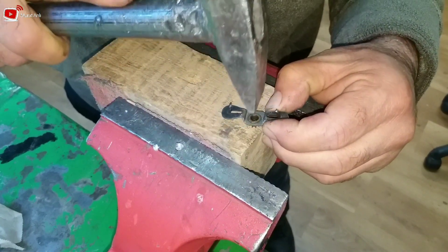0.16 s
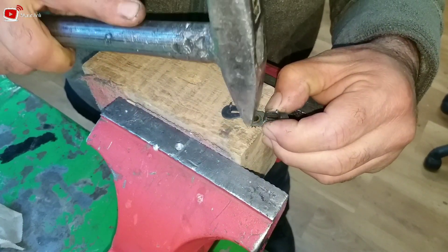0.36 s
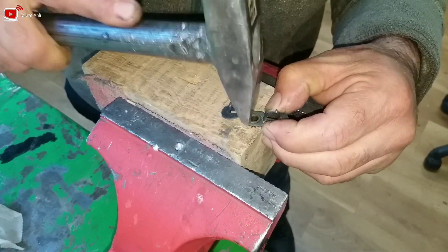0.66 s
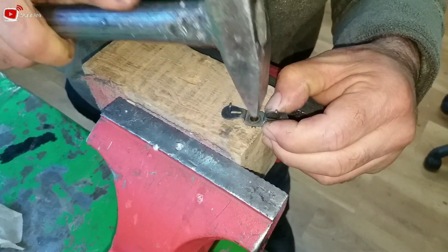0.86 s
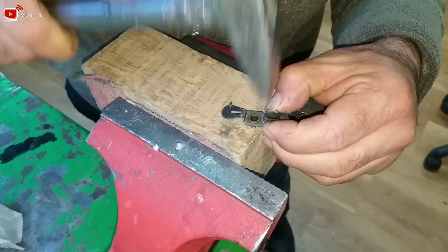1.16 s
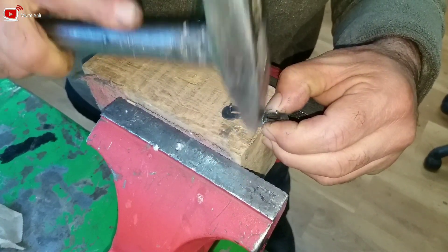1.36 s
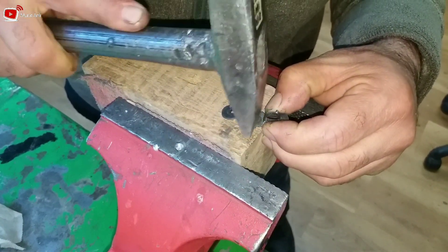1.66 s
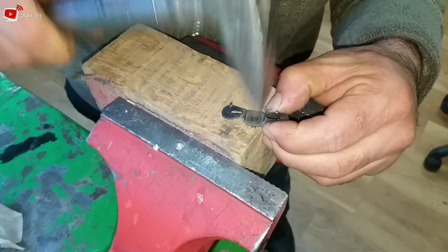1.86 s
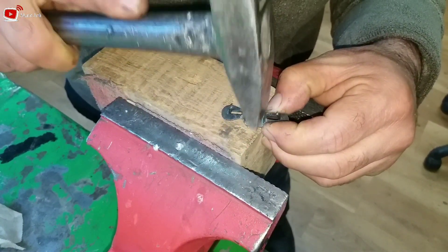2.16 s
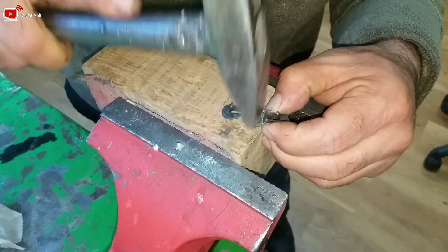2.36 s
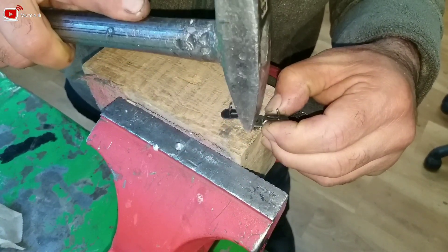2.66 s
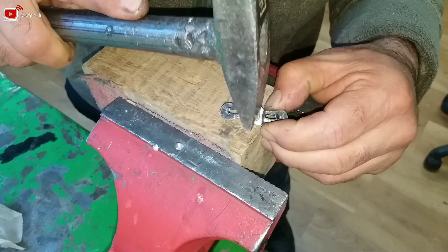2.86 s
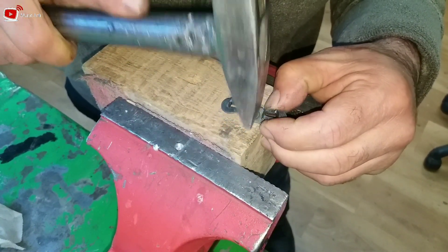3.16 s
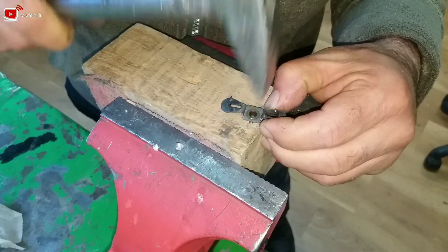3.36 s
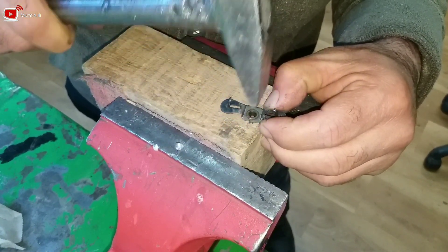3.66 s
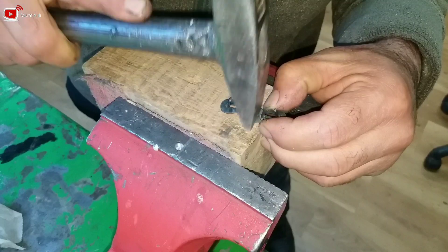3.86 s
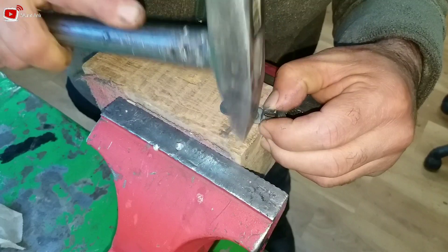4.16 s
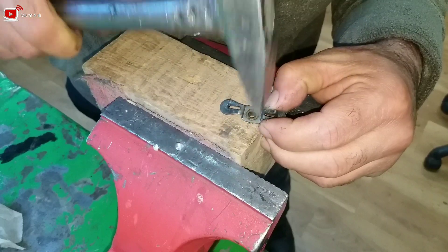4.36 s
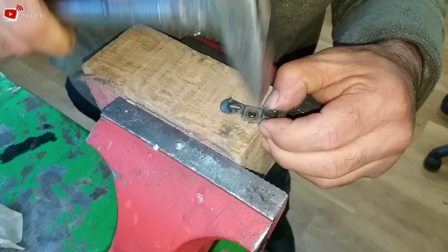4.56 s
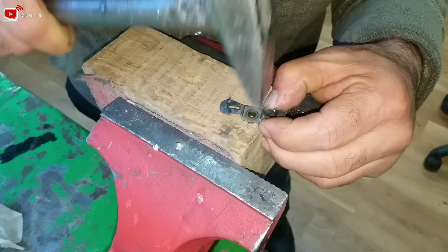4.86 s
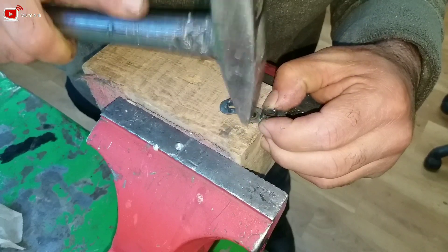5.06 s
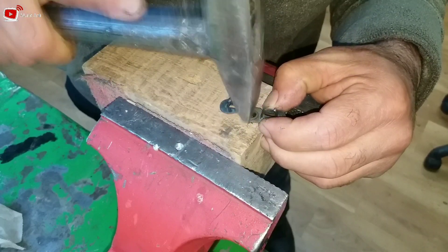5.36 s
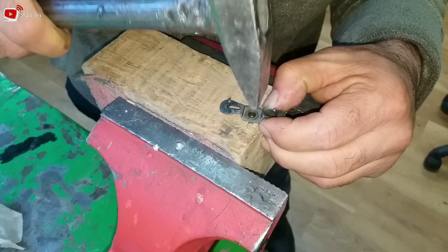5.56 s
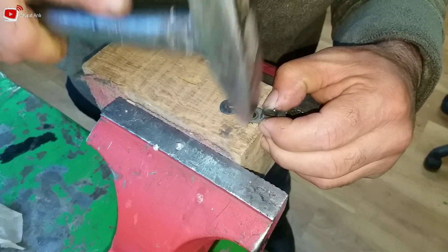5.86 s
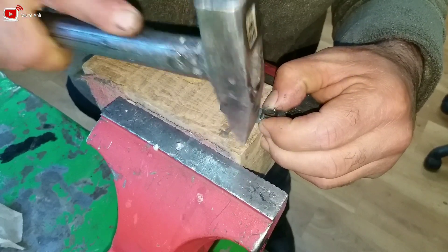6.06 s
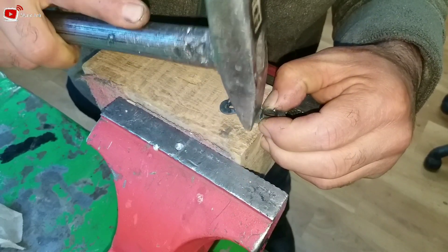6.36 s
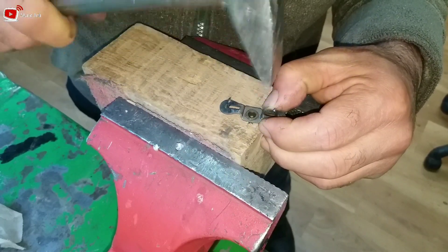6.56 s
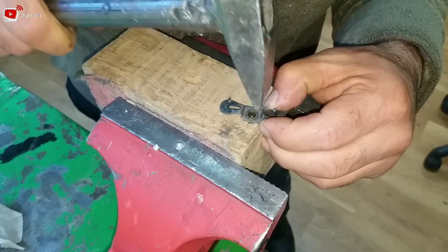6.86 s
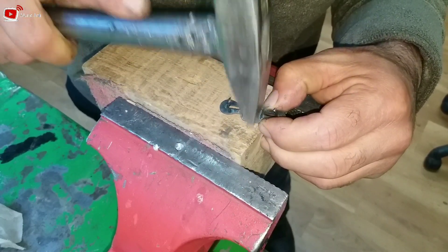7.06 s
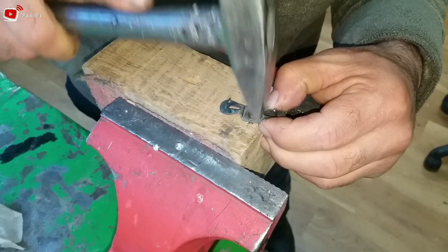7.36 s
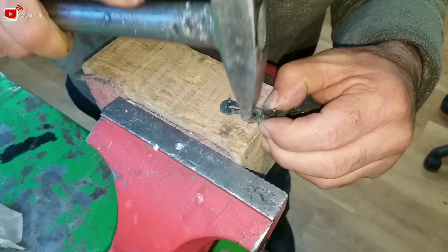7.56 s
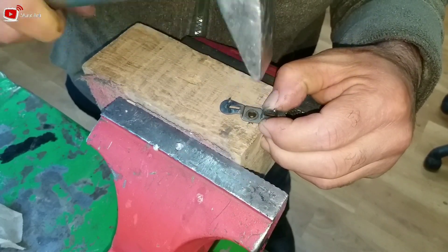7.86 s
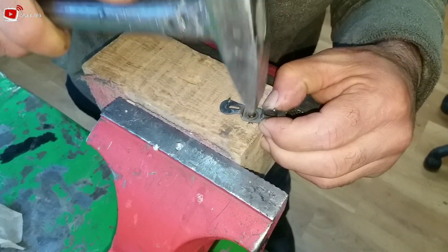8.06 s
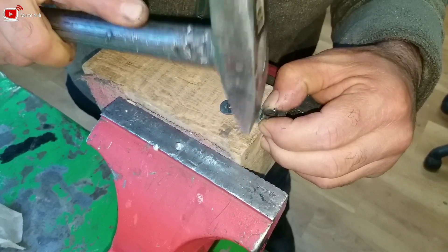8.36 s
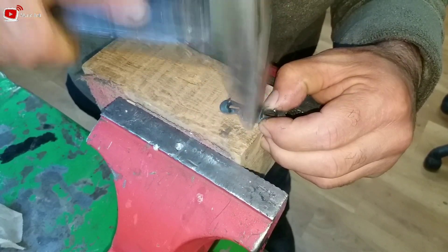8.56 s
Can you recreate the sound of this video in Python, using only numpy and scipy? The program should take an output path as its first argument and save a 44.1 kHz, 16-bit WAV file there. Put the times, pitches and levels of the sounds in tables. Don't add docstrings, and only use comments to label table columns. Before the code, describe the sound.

A hammer raps small metal rivets on a wooden block, hard cracks alternating with faint taps, about three a second, in a small workshop.

```python
import sys
import numpy as np
from scipy import signal
from scipy.fft import rfft, irfft
from scipy.io import wavfile

SR = 44100
rng = np.random.default_rng(int(sys.argv[2]) if len(sys.argv) > 2 else 0)


def voltage_ratio(decibels):
    exponent = np.asarray(decibels, float) / 20
    return 10 ** exponent


def master(y):
    cut = np.clip(np.atleast_2d(y).T, -1, 1)
    pcm = np.round(cut * 32767)
    wavfile.write(sys.argv[1], SR, pcm.astype(np.int16))


N = 383611

# (time [s], level [dB], song of the head [dB], brightness [dB])
BLOWS = [(0.3175, -35.5, -2.5, -5), (0.6039, 0, 2.5, -2), (0.9944, -30, -2.5, -3.5), (1.28, -3.5, -1.5, -1),
         (1.6194, -37, 6, 3.5), (1.9014, -11, 4.5, 1), (2.2312, -35, 1, -4), (2.4915, -63, 11, -10.5),
         (2.5797, -53, 9, 10.5), (3.1846, -37.5, 1, 0.5), (3.487, -7.5, -0.5, 0), (3.802, -24.5, -1, -3),
         (4.0821, -9, 4.5, -1), (4.4209, -26, 3, 3), (4.7, -4.5, -1.5, 0.5), (5.0664, -38, 2.5, 1),
         (5.3612, -1, 1.5, 0), (5.7214, -26, -6.5, -4.5), (6.0093, -3.5, -1, -0.5),
         (6.3365, -35, -5.5, 0.5), (6.6327, -9.5, -1, -0.5), (6.963, -33, 0.5, 1), (7.2609, -10, -5, -3),
         (7.607, -29.5, 0.5, -9), (7.9295, -0.5, 2.5, 0), (8.2803, -26, -2.5, -1),
         (8.5681, -4.5, -1.5, 0.5)]
BLOW_S, BLOW_DB, HEAD_SONG_DB, BRIGHT_DB = np.transpose(BLOWS)
# (time [s], level against that tap [dB])
REBOUNDS = [(.3512, -4), (1.0288, -5.5), (1.6485, -11), (3.8365, -18.5), (4.449, -13), (5.7542, -6.5),
            (6.362, -17.5), (6.990, -12), (7.6364, -13), (8.3064, -22)]
AIR_EDGE_HZ = 15400


def crack():
    # (frequency [Hz], level [dB per Hz])
    crack_colour = [(30, -51), (60, -27), (300, -1.5), (900, -3.5), (2600, -7), (4400, -4), (8200, -13.5),
                    (9600, -19.5), (14500, -13.5), (16000, -23), (17000, -48)]
    whole = click(crack_colour)
    top = signal.sosfilt(signal.butter(2, 8800, "high", fs=SR, output="sos"), whole)
    low = signal.sosfilt(signal.butter(2, 2600, "low", fs=SR, output="sos"), whole)
    middle = whole - top - low
    balanced = voltage_ratio(7.5) * middle + voltage_ratio(-5.0) * top + voltage_ratio(15) * low
    each_blow = np.tile(balanced, (len(BLOWS), 1))
    return strike(BLOW_DB, coloured(each_blow), REBOUNDS)


def tick():
    # (frequency [Hz], level [dB], t60 [s])
    tick_modes = [(1723, -9, 0.0082), (3430, -7, 0.012), (3880, -5.5, 0.011), (4446, -0.5, 0.008),
                  (4960, 0, 0.0041), (6170, 0.5, 0.0041), (7454, 1, 0.0067), (8020, 2.5, 0.0039),
                  (10680, -12, 0.0058), (12050, -12, 0.0073), (14000, -9, .004), (15800, -18, .003)]
    ticks = uneven(ring(tick_modes, seconds=0.02, rise_s=0.00086), spread_db=2.5)
    return strike(BLOW_DB + head_share_db() + 15.5, coloured(ticks), REBOUNDS)


def steel_ring():
    # (frequency [Hz], level [dB], t60 [s])
    low_modes = [(1030, -1.5, 0.048), (1342, 3.5, 0.11), (1573, 8, 0.11), (1786, 12.5, 0.059),
                 (2075, 8, 0.067)]
    # (frequency [Hz], level [dB], t60 [s])
    head_modes = [(3000, -19, 0.06), (4020, -4.5, 0.1), (4410, -6, 0.1), (4900, -11, 0.15),
                  (5700, -25, .04), (5940, -26.5, 0.046), (6200, -13, 0.054), (6950, 7, 0.028),
                  (8200, -24.5, .06), (10400, -12, 0.16), (12800, -24, .08)]
    low = uneven(ring(low_modes, seconds=0.2, rise_s=0.00099), spread_db=1.5)
    head = uneven(ring(head_modes, seconds=0.2, rise_s=0.00047), spread_db=2.5)
    low_rings = strike(BLOW_DB - 22.5, low)
    return low_rings + strike(BLOW_DB + head_share_db() - 7.5, coloured(head), REBOUNDS)


def knock():
    # (frequency [Hz], level [dB per Hz])
    knock_colour = [(30, -58.5), (45, -36), (60, -13.5), (130, 2.5), (450, -5), (800, -12), (1500, -22),
                    (3000, -45), (8000, -81.5)]
    each_blow = np.tile(click(knock_colour), (len(BLOWS), 1))
    return strike(BLOW_DB + thud_share_db() + 24, each_blow)


def wood_thud():
    # (frequency [Hz], level [dB], t60 [s])
    thud_modes = [(67, -17.5, 0.99), (88.1, -14.5, 0.32), (112, -9.5, 0.81), (131.7, -5.5, 0.98),
                  (139.4, -5.5, 0.53), (154, -13, 0.96), (177.5, -1, 0.5), (211.2, -6.5, .4),
                  (220.6, 0, 0.41), (252, -19, 0.14), (273, -9.5, 0.13), (296.7, -4, 0.35),
                  (337, -2.5, 0.11), (359, -3.5, 0.48), (407.5, 1.5, 0.18), (438.4, -2, 0.27),
                   (492.3, -6.5, 0.3), (570, -18.5, 0.065), (573.2, -8, 0.069), (616, -3, 0.087),
                   (649, -5.5, 0.34), (723, -9.5, 0.24), (960, -22, .1)]
    thuds = uneven(ring(thud_modes, seconds=0.9, rise_s=0.01), spread_db=2.5)
    return strike(BLOW_DB + thud_share_db() - 1.0, thuds)


def head_share_db():
    return share(hard_db=-19.5, per_db=0.85, most_db=-6)


def thud_share_db():
    touch_below_db, touch_db = -45, -12.5
    return share(hard_db=-21.5, per_db=0.4, most_db=-8) + touch_db * (BLOW_DB < touch_below_db)


def share(hard_db, per_db, most_db):
    return np.minimum(hard_db - per_db * BLOW_DB, most_db)


def coloured(sounds, size=512):
    head_band_hz = 2700, 3700, 5200, 6900
    hz = abs(np.fft.fftfreq(size, 1 / SR))
    gain_db = np.array([np.interp(hz, head_band_hz, (0, song_db, song_db, bright_db))
                        for song_db, bright_db in zip(HEAD_SONG_DB, BRIGHT_DB)])
    return signal.oaconvolve(sounds, causal(gain_db), axes=1)[:, :sounds.shape[1]]


def uneven(modes, spread_db):
    return voltage_ratio(spread_db * rng.standard_normal((len(BLOWS), len(modes)))) @ modes


def strike(db, sounds, hops=()):
    out = np.zeros(N + sounds.shape[1])
    loud = voltage_ratio(db)[:, None] * sounds
    for s, sound in zip(BLOW_S, loud):
        out[round(s * SR):][:len(sound)] += sound
    for s, hop_db in hops:
        tap = loud[np.searchsorted(BLOW_S, s) - 1]
        out[round(s * SR):][:len(tap)] += voltage_ratio(hop_db) * tap
    return out[:N]


def ring(modes, seconds, rise_s):
    hz, db, t60 = np.transpose(modes)[:, :, None]
    t = np.arange(int(seconds * SR)) / SR
    return voltage_ratio(db - 60 * t / t60) * np.sin(2 * np.pi * hz * t) * (1 - np.exp(-t / rise_s))


def click(spectrum, size=4096):
    return unit(causal(read(spectrum, abs(np.fft.fftfreq(size, 1 / SR)))))


def causal(gain_db):
    log_gain = np.log(voltage_ratio(np.maximum(gain_db, -100)))
    response = np.fft.ifft(np.exp(log_gain - 1j * signal.hilbert(log_gain).imag)).real
    return response[..., :gain_db.shape[-1] // 2]


def read(points, hz):
    f, value = np.transpose(points)
    return np.interp(np.log(hz + 1), np.log(f + 1), value)


def unit(x):
    return x / np.linalg.norm(x)


def direct(x):
    # (start [s], end [s], level [dB])
    echoes = [
        (.0012, 0.004, -8),
        (.003, 0.0111, -2),
        (.011, .03, -11.5),
    ]
    echoes_per_s, right_lag = 1500, 1
    t = np.arange(SR // 20) / SR
    taps = rng.standard_normal((2, len(t))) * (rng.random((2, len(t))) < echoes_per_s / SR)
    paths = sum(voltage_ratio(db) * np.sqrt(2) * unit(taps * (t > start) * (t < end)) for start, end, db in echoes)
    paths[[0, 1], [0, right_lag]] = 1
    return signal.oaconvolve(x[None], paths, axes=1)[:, :N]


def shop(x):
    # (frequency [Hz], t60 [s])
    shop_t60 = [(60, .8), (250, 0.58), (450, 0.5), (800, 0.42), (1500, 0.46), (4000, 0.45), (8000, 0.37),
                (16000, 0.16)]
    t = np.arange(SR // 64 + 4) * 64 / SR
    hz = np.fft.rfftfreq(256, 1 / SR)[:, None]
    decay = voltage_ratio(-60 * t / read(shop_t60, hz)) * (hz < AIR_EDGE_HZ)
    swell = 1 - np.exp(-np.arange(SR) / SR / 0.0052)
    common = unit(pair(decay, SR, size=256) * swell)
    blow = np.searchsorted(BLOW_S, np.arange(N) / SR + 0.0009)
    out = np.zeros((2, N))
    for k in range(3):
        tail = unit(common + 0.83 * unit(pair(decay, SR, size=256) * swell))
        out += signal.fftconvolve((x * (blow % 3 == k))[None], tail, axes=1)[:, :N]
    return out


def pair(shape, count, size):
    # (frequency [Hz], left-right likeness [-1 to 1])
    likeness = [(60, 0.99), (180, 0.93), (550, 0.65), (1650, -0.17), (4970, 0.0071), (15000, -0.29)]
    a, b, c, d = rng.standard_normal((4,) + shape.shape)
    same = np.clip(read(likeness, np.fft.rfftfreq(size, 1 / SR)), -1, 1)[:, None]
    left = a + 1j * b
    right = same * left + np.sqrt(1 - same ** 2) * (c + 1j * d)
    z = np.array([left, right])
    return signal.istft(z * shape, nperseg=size, noverlap=size * 3 // 4)[1][:, :count]


def room_tone():
    # (frequency [Hz], level [dB per Hz])
    tone_colour = [(18, -45), (30, -18), (142, 3), (235, -14.5), (350, -18), (1270, -20), (8310, -19),
                   (15000, -19.5)]
    # (frequency [Hz], level [dB rms])
    hum_lines = [(129.2, -74.5), (150.7, -81.5), (172.3, -78), (199.2, -91), (300, -74.5), (398.4, -91)]
    colour = voltage_ratio(read(tone_colour, np.fft.rfftfreq(2048, 1 / SR)))
    noise = pair(np.tile(colour[:, None], N // 512 + 5), N, size=2048)
    t = np.arange(N) / SR
    hum = sum(voltage_ratio(db) * np.sqrt(2) * np.sin(2 * np.pi * (hz * t + rng.random())) for hz, db in hum_lines)
    return voltage_ratio(-67.5) * noise / noise.std() + hum


def scene():
    cracks, ticks, steel = crack(), tick(), steel_ring()
    knocks, wood = knock(), wood_thud()
    near = direct(voltage_ratio(-11.0) * cracks + steel + ticks) + voltage_ratio(-11.0) * knocks + voltage_ratio(-8.0) * wood
    to_walls = voltage_ratio(10.5) * cracks + voltage_ratio(-15.0) * steel + voltage_ratio(-11) * ticks
    to_walls += voltage_ratio(13.0) * knocks + voltage_ratio(0.8) * wood
    return near + shop(to_walls) + room_tone()


def gain_control(x):
    power_db = 10 * np.log10(signal.lfilter([.02], [1, -.98], (x ** 2).mean(0)) + 1e-12)
    fall = np.arange(N) * 89.0 / SR
    held_db = np.maximum.accumulate(power_db + fall) - fall
    cut_db = .5 * np.maximum(held_db + 24, 0)
    grip = np.exp(-1 / (0.0016 * SR))
    cut_db = signal.lfilter([1 - grip], [1, -grip], cut_db)
    bass = signal.sosfilt(signal.butter(1, 500, fs=SR, output="sos"), x)
    return bass * voltage_ratio(-.7 * cut_db) + (x - bass) * voltage_ratio(-cut_db)


def gated(x):
    from_hz, threshold_db, slope, depth_db = 330, -53.5, 1.6, 10
    upper = x - signal.sosfiltfilt(signal.butter(2, from_hz, fs=SR, output="sos"), x)
    power_db = 10 * np.log10(signal.lfilter([.002], [1, -.998], (upper ** 2).mean(0)) + 1e-12)
    return x - upper + upper * voltage_ratio(-np.clip(slope * (threshold_db - power_db), 0, depth_db))


def microphone_ports(x):
    # (frequency [Hz], left minus right [dB])
    lean = [(60, 3.5), (180, 0.46), (550, -0.4), (1650, 1.5), (4970, -1.66), (15000, -1)]
    hz = np.fft.rfftfreq(2 ** 19, 1 / SR)
    lean_db = read(lean, hz) * np.array([[.5], [-.5]])
    edge_db = -14.5 * np.clip((hz - AIR_EDGE_HZ) / 300, 0, 1)
    return irfft(rfft(x, 2 ** 19) * voltage_ratio(lean_db + edge_db))[:, :N]


def roll_off(x):
    return signal.sosfilt(signal.butter(12, 16860, fs=SR, output="sos"), x)


def record(dry):
    held = microphone_ports(gated(gain_control(dry)))
    return roll_off(0.97 * np.tanh(held / 0.88))


dry = scene()
out = record(dry)
master(out)
```